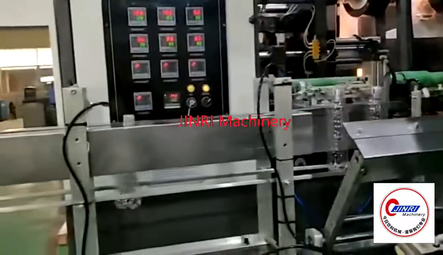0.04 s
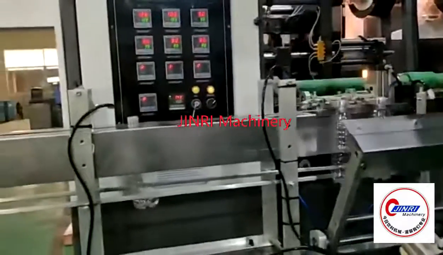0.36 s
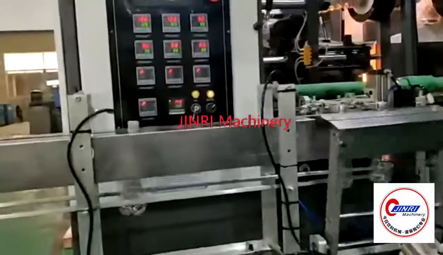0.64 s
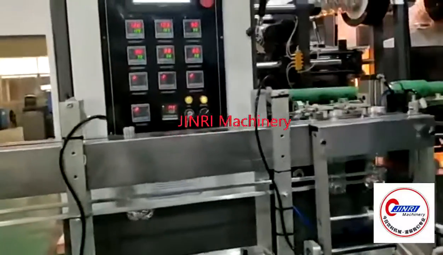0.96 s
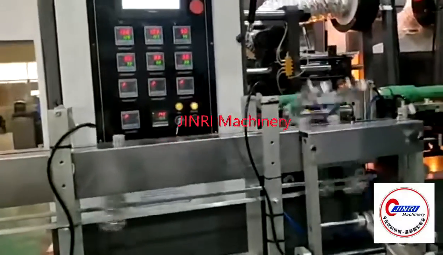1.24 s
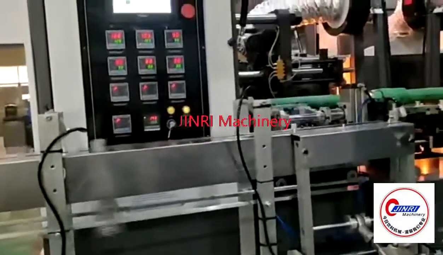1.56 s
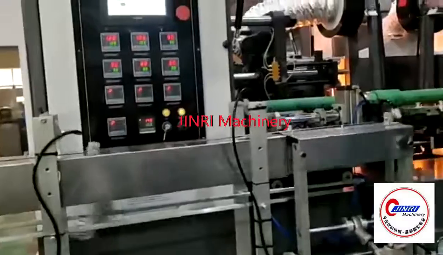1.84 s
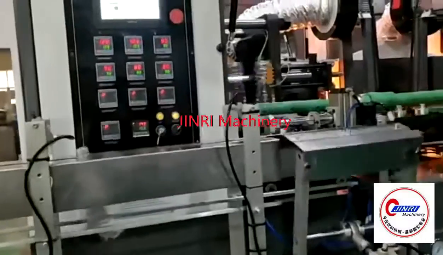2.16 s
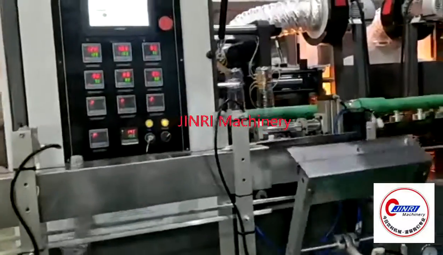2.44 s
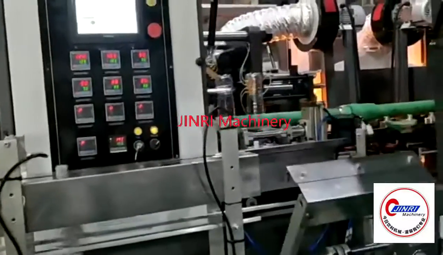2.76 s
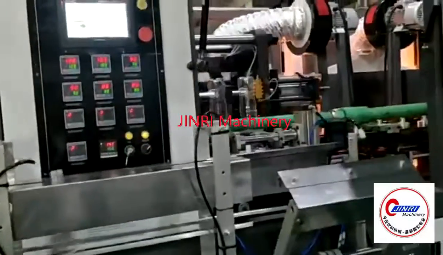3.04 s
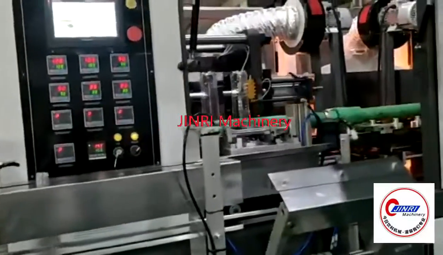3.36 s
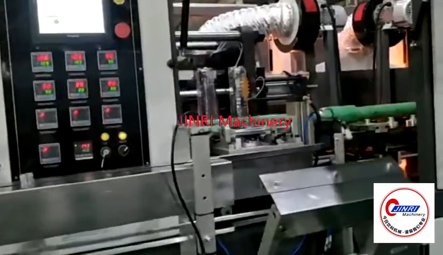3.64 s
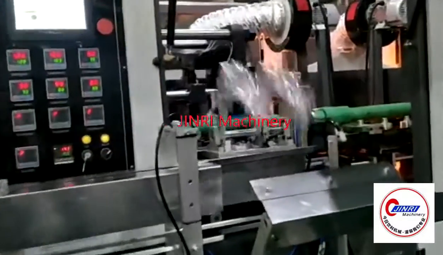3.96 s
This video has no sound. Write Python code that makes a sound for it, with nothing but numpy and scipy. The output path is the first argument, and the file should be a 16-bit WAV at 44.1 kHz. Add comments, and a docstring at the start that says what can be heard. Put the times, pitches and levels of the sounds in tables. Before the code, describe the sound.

A bottle blowing machine hisses bursts of compressed air over clunks, rattles and low rumble.

```python
"""A bottle blowing machine runs through one cycle in a factory hall, close by.
First the carriage throbs, rattles and clunks against the steel frame as valves dump air in fading hisses.
Just after a second, a hard, steady blast cuts in, shuts off and leaves a hollow ring behind.
After a lull of small puffs and clunks, another valve vents and the carriage rumbles on again.
Near the end the closing stop clangs, and a last valve opens."""
import sys
import numpy as np
from scipy import signal
from scipy.fft import rfft, irfft, next_fast_len
from scipy.io import wavfile
from scipy.ndimage import uniform_filter1d, map_coordinates

SR = 44100
rng = np.random.default_rng(int(sys.argv[2]) if len(sys.argv) > 2 else 0)


def output_pcm(signal):
    """Save a mono or channel-first signal as 16-bit PCM at the path in sys.argv[1].

    Samples are clipped to [-1, 1] before scaling.
    """
    pcm = np.clip(np.atleast_2d(signal).T, -1, 1) * 32767
    wavfile.write(sys.argv[1], SR, np.round(pcm).astype(np.int16))


N = 176400

# The bright hiss of escaping air. Each row: frequency in Hz, relative level in dB.
HISS_SPECTRUM = [(2000, -17.5), (4200, 15), (5600, 7.5), (7800, -1), (10000, -2.5), (12500, -0.5),
                 (14500, -5), (16000, -24)]


def exhausts():
    """Valves dump compressed air: the pressure sags, and the hiss dies faster than the roar."""
    # Exhaust valves. Each row: start in seconds, rise in seconds, time open in seconds, level in dB,
    # pressure fall in dB per second, hiss against the roar in dB.
    valves = [(-.06, .05, 0.26, -24.5, 16, -11), (0.267, 0.16, 0.79, -19, 28.5, -8.5),
              (2.607, 0.079, 0.82, -18.5, 16, -3), (3.944, 0.068, 0.18, -19.5, 13, -2)]
    # Small pilot valve puffs. Each row: start in seconds, rise in seconds, level in dB.
    puffs = [(.785, 0.012, -34.5), (1.039, 0.045, -51), (2.012, 0.0053, -50.5), (2.2, 0.053, -47),
             (2.388, 0.053, -47), (2.88, 0.046, -29), (3.23, 0.029, -36.5), (3.632, 0.053, -47)]
    # The roar of the vent. Each row: frequency in Hz, relative level in dB.
    roar_spectrum = [(100, -29), (350, -9), (680, 1.5), (900, -2.5), (1300, 1), (1950, 2.5), (2700, -1.5),
                     (3500, 1.5), (4450, -1), (4750, -16), (6000, -13.5), (7500, -25.5), (11000, -63),
                     (16000, -60)]
    close_db_per_s, puff_fall_db_per_s, hiss_sag_ratio = 79, 137, 2.53
    roar_power, hiss_power = np.zeros(N), np.zeros(N)
    for start, rise, length, db, fall_db_per_s, hiss_db in valves:
        sag_db = fall_db_per_s * since(start + rise)
        flow = opening(start, rise) * amp(db - close_db_per_s * since(start + length))
        roar_power += (flow * amp(-sag_db)) ** 2
        hiss_power += (flow * amp(hiss_db - hiss_sag_ratio * sag_db)) ** 2
    for start, rise, db in puffs:
        hiss_power += (opening(start, rise) * amp(db - puff_fall_db_per_s * since(start + rise))) ** 2
    flutter = amp(1.2 * wobble(35.47))
    roar = np.sqrt(roar_power) * rush(roar_spectrum)
    hiss = np.sqrt(hiss_power) * rush(HISS_SPECTRUM)
    return flutter * (roar + hiss)


def blast():
    """A spluttering jet shuts off sharply; spent air and a wavering hollow ring linger."""
    # The hard jet. Each row: frequency in Hz, relative level in dB.
    jet_spectrum = [(88, -70), (150, -27), (205, -14), (320, -30), (389, -12.5), (463, -21), (697, -5),
                    (933, -9.5), (1200, -3.5), (1880, -3.5), (2770, -15.5), (4250, -8), (7330, -22),
                    (9810, -28), (12900, -17.5), (15600, -24)]
    # The wash of spent air. Each row: frequency in Hz, relative level in dB.
    wash_spectrum = [(180, -71), (300, -39), (691, 0.5), (1020, -16), (1310, -17), (1570, -2), (2780, -5),
                     (3670, -5.5), (5350, -14.5), (12900, -35.5), (15000, -49)]
    # The hollow ring. Each row: pitch in Hz, width in Hz, relative level in dB.
    cavity_modes = [(739, 104, 0.5), (1285, 76, 3.5), (1860, 110, -7), (3640, 29, -7.5), (4470, 87, -11)]
    on_s, off_s, shutoff_db_per_s = 1.152, 1.565, 524

    def gate(db, fall_db_per_s):
        return opening(on_s, rise_s=0.017) * amp(db - fall_db_per_s * since(off_s))
    hollow = resonances(cavity_modes) * amp(1.2 * wobble(30)) * opening(on_s, rise_s=0.24)
    jet = gate(-16.5, shutoff_db_per_s) * amp(1.5 * wobble(39.54)) * rush(jet_spectrum)
    splutter = gate(-30, shutoff_db_per_s) * unit(amp(6 * wobble(81))) * rush(HISS_SPECTRUM)
    ring = gate(-24.5, fall_db_per_s=42) * hollow
    wash = gate(-25, fall_db_per_s=79) * rush(wash_spectrum)
    return jet + splutter + ring + wash


def mottle(air):
    """A faint, watery warble: patches of the spectrum swell and sink at random."""
    depth_db = 2
    spectrum = signal.stft(air, nperseg=1024)[2]
    patches = uniform_filter1d(rng.standard_normal(spectrum.shape[1:]), size=7, axis=0)
    patches = uniform_filter1d(patches, size=6, axis=1)
    gain = unit(amp(depth_db * unit(patches)))
    return signal.istft(spectrum * gain, nperseg=1024)[1][:, :N]


def clunks():
    """Each blow follows a short scrape, rings the frame briefly and sets loose parts rattling."""
    # Blows on the frame. Each row: time in seconds, clank level in dB, rattle level in dB,
    # rattle t60 in seconds, brightness in dB per octave.
    blows = [(0.2, -34, -27.5, 1, -10), (.457, -16, -10.5, 0.1, -1.5), (0.609, -17.5, -23, 1, -5.5),
             (0.792, -16, -12.5, 0.25, -2.5), (0.81, -31, -16, 0.24, 7), (.824, -14, -20.5, 0.64, -7),
             (0.912, -33, -23.5, 0.74, -2), (1.155, -8, -17, 0.41, 0), (1.419, -11.5, -40, 0.12, 3),
             (1.478, -11, -29.5, 0.74, -3), (1.529, -19, -22.5, 0.25, 7), (1.741, -35, -27.5, 0.38, 3),
             (2.019, -31, -30, 0.44, -5.5), (2.07, -42, -27, 0.28, -8.5), (2.154, -14.5, -29, 0.77, -3),
             (2.182, -36, -25.5, 0.54, -2), (2.897, -35, -20, 1.0, -1), (3.11, -24, -27, 0.52, -14),
             (3.638, -36, -37, 0.43, 2), (3.661, -31, -28, 0.73, -0.5), (3.769, -46, -38, 1, 6),
             (3.848, -59, -34.5, 1, -18)]
    # The steel frame's modes. Each row: pitch in Hz, relative level in dB.
    steel_modes = [(440, -14.5), (620, -11), (1130, 10), (1350, 3.5), (1530, -20), (1690, 0), (1960, 14.5),
                   (2250, -3), (3100, -4), (3650, -1.5), (4170, 6.5)]
    # The colour of the rattle. Each row: frequency in Hz, relative level in dB.
    rattle_spectrum = [(60, -27), (250, 0), (420, -4.5), (650, 3.5), (850, 2), (1050, 5.5), (1600, 4.5),
                       (2200, 3), (2800, -3), (4350, -2), (4750, -18), (7000, -27.5), (9000, -47),
                       (15000, -41)]
    clank_t60_s, clank_rise_s, scrape_db, scrape_s = 0.029, 0.00034, -6, 0.0088
    out = np.zeros((2, N))
    t = np.arange(SR // 5) / SR
    hz, mode_db = np.transpose(steel_modes)[:, :, None]
    for start, clank_db, rattle_db, t60, tilt_db in blows:
        strength, detune = rng.standard_normal((2, len(hz), 1))
        phase = rng.uniform(0, 2 * np.pi, hz.shape)
        phase = phase + 0.21 * rng.standard_normal((2, len(hz), 1))  # a little stereo width
        gains = amp(mode_db + 2 * strength + tilt_db * np.log2(hz / 1000))
        modes = gains * np.sin(2 * np.pi * hz * (1 + 0.029 * detune) * t + phase)
        attack = 1 - np.exp(-t / clank_rise_s)
        clank = unit(modes.sum(1)) * attack * amp(clank_db - 60 * t / clank_t60_s)
        first = round(start * SR)
        out[:, first:first + len(t)] += clank[:, :N - first]
        scrape = amp(scrape_db) * np.exp(-abs(np.arange(N) / SR - start) / scrape_s)
        envelope = np.maximum(scrape, strike(start, rise_s=0.004, t60_s=t60))
        chatter = unit(amp(1.58 * wobble(130)))
        out += amp(rattle_db) * envelope * chatter * rush(rattle_spectrum, tilt_db)
    return out


def carriage():
    """The moving carriage rumbles and throbs, and thuds at its stops."""
    # The rumble as it travels. Each row: time in seconds, level in dB.
    travel = [(0.0, -31), (.19, -34.5), (.205, -26), (.42, -28), (.8, -24), (1.13, -31.5), (1.23, -48),
              (1.76, -55), (2.0, -56), (2.29, -41.5), (2.38, -52), (2.6, -44.5), (2.672, -29), (3.0, -24.5),
              (3.18, -32), (3.3, -25), (3.582, -40), (3.66, -30), (3.92, -33)]
    # The weight of the rumble. Each row: frequency in Hz, relative level in dB.
    rumble_spectrum = [(20, -16), (50, -4), (90, -2), (150, 0), (220, 2.5), (300, -1), (390, -16.5),
                       (600, -23.5), (1000, -30), (3000, -66)]
    # Heavy stops and jolts. Each row: start in seconds, pitch in Hz, level in dB.
    thuds = [(0.197, 246, -18), (.51, 201.6, -14), (0.656, 108, -18.5), (0.785, 186.4, -16),
             (.85, 208, -16.5), (1.131, 224, -26), (1.334, 213, -35), (1.496, 215.3, -22),
             (1.834, 215, -37.5), (2.095, 193, -38), (2.231, 90, -32), (2.46, 201, -28),
             (2.513, 112, -24.5), (2.906, 235, -18), (3.232, 124, -16), (3.26, 198.3, -15),
             (3.675, 92.6, -25), (3.949, 72, -16)]
    level_db = np.interp(np.arange(N) / SR, *np.transpose(travel))
    throb_db = 2 * wobble(30)
    out = amp(level_db + throb_db) * rush(rumble_spectrum)
    for start, hz, db in thuds:
        out += amp(db) * strike(start, rise_s=0.013, t60_s=0.2) * np.sin(2 * np.pi * hz * since(start))
    return out


def squeaks():
    """Single metal parts sing out in a narrow band."""
    # Each row: start in seconds, pitch in Hz, level in dB, t60 in seconds.
    parts = [(.292, 4150, -25.5, 0.46), (0.455, 957, -22, 0.61), (.615, 1180, -22, 0.61),
             (1.523, 4950, -12, 0.082), (2.396, 2280, -40, 0.17), (3.776, 3770, -37, 0.38)]
    width_share = 0.12  # of the pitch
    return sum(amp(db) * strike(start, rise_s=0.0048, t60_s=t60) * resonances([(hz, width_share * hz, 0)])
               for start, hz, db, t60 in parts)


def knocks():
    """The sheet housing answers some blows with a short, boxy knock."""
    # Dull knocks. Each row: start in seconds, level in dB.
    hits = [(0.791, -22), (1.484, -36), (2.154, -32), (2.897, -21), (2.944, -23), (3.0, -25.5),
            (3.111, -26), (3.636, -25.5)]
    # The body of the housing. Each row: frequency in Hz, relative level in dB.
    housing_spectrum = [(200, -21), (330, -3), (420, 2), (630, -3.5), (800, -49), (1500, -49)]
    power = sum((amp(db) * strike(start, rise_s=0.0017, t60_s=0.2)) ** 2 for start, db in hits)
    return np.sqrt(power) * rush(housing_spectrum)


def clang():
    """The closing stop is struck sharply and rings in a few narrow modes."""
    # Each row: pitch in Hz, relative level in dB.
    stop_modes = [(1000, 1), (1190, -1), (1910, -4), (2220, -1), (3830, -14.5), (4100, -6)]
    start_s, level_db, width_hz = 3.636, -30.5, 34
    ring = resonances([(hz, width_hz, db) for hz, db in stop_modes])
    return amp(level_db) * strike(start_s, rise_s=0.0028, t60_s=0.54) * ring


def panels(near):
    """Nearby steel panels colour the air and the blows with quick reflections."""
    level, t60_s, delay_s = amp(-9), 0.062, 0.004
    tail = echoes(near, [(1000, t60_s)])
    reflections = filtered(tail, lambda hz: np.exp(-2j * np.pi * hz * delay_s))
    return (near + level * reflections) / np.hypot(1, level)


def hall(near):
    """The factory hall answers with a faint, short reverb."""
    # Each row: frequency in Hz, t60 in seconds.
    decay_times = [(500, 0.48), (4000, 0.14), (12000, 0.37)]
    return amp(-20) * echoes(near, decay_times)


def room_tone():
    """A faint, steady bed of noise lies under the machine."""
    # Each row: frequency in Hz, relative level in dB.
    bed_spectrum = [(40, -9), (200, -4), (360, -45), (2200, -2), (3000, -26), (4900, -13), (6500, -67),
                    (15000, -72)]
    return amp(-57) * rush(bed_spectrum)


def amp(db):
    return 10 ** (np.asarray(db) / 20)


def unit(x):
    return x / np.sqrt(np.mean(x ** 2) + 1e-20)


def along(points, hz):
    """A curve through (Hz, value) points on a log frequency axis."""
    freqs, values = np.transpose(points)
    return np.interp(np.log(hz + 1), np.log(freqs + 1), values)


def since(start):
    """Seconds elapsed after start, zero before."""
    return np.maximum(np.arange(N) / SR - start, 0)


def opening(start, rise_s):
    """A smooth rise from 0 to 1."""
    return np.sin(np.pi / 2 * np.minimum(since(start) / rise_s, 1)) ** 2


def strike(start, rise_s, t60_s):
    """The envelope of a hit: a smooth attack, and a fall of 60 dB in t60_s."""
    return opening(start, rise_s) * amp(-60 * since(start) / t60_s)


def wobble(rate):
    """A smooth random curve, rate knots a second."""
    return map_coordinates(rng.standard_normal(int(N * rate / SR) + 4), [np.arange(N) * rate / SR])


def filtered(x, response):
    """x shaped by a frequency response."""
    size = next_fast_len(N + SR // 4)
    return irfft(rfft(x, size) * response(np.fft.rfftfreq(size, 1 / SR)), size)[..., :N]


def noise(gain):
    """Stereo noise of rms 1, near mono in the bass and wide in the treble."""
    # Each row: frequency in Hz, correlation of left and right.
    correlation = [(60, 1), (300, 0.91), (600, 0.73), (1200, 0.12), (2400, 0.034), (6000, 0.039)]

    def mid_side(hz):
        turn = np.arccos(np.clip(along(correlation, hz), -1, 1)) / 2
        return gain(hz) * np.array([np.cos(turn), np.sin(turn)])
    mid, side = filtered(rng.standard_normal((2, N)), mid_side)
    return unit(np.array([mid + side, mid - side]))


def rush(spectrum, tilt_db=0):
    """Noise with a spectrum, tilted by tilt_db per octave from 500 to 5000 Hz."""
    return noise(lambda hz: amp(along(spectrum, hz) + tilt_db * np.log2(np.clip(hz, 500, 5000) / 1000)))


def resonances(peaks):
    """Noise ringing in (Hz, width Hz, dB) peaks."""
    return noise(lambda hz: sum(amp(db) / (1 + (2 * (hz - pitch) / width) ** 2)
                                for pitch, width, db in peaks))


def echoes(x, t60s):
    """Diffuse reflections of x, dying away by (Hz, t60 in seconds) points."""
    hz, t, spectrum = signal.stft(rng.standard_normal((2, SR // 2)), SR, nperseg=256)
    t60 = along(t60s, hz)[:, None]
    tail = signal.istft(spectrum * amp(-60 * t / t60) / np.sqrt(t60), SR, nperseg=256)[1]
    return signal.fftconvolve(x, tail / np.linalg.norm(tail[0]), axes=1)[:, :N]


def scene():
    """Air and metal bounce off the panels and the hall, over the dry carriage and the room tone."""
    air = mottle(exhausts() + blast())
    near = panels(air + clunks() + clang() + squeaks() + knocks())
    return near + hall(near) + carriage() + room_tone()


def record(dry):
    """Each microphone port has its own colour, and the very top is cut away."""
    # Each row: frequency in Hz, left minus right in dB.
    balance = [(100, -0.5), (700, -2), (1200, 3), (2200, -5.5), (2800, -5.5), (3500, 2.5), (4400, 7.5),
               (5200, -2.5), (6300, -10), (8500, -8), (11000, -1), (14500, -6)]
    top_hz = 15800

    def ports(hz):
        lean = amp(along(balance, hz) * np.array([[.5], [-.5]]))
        return lean / np.sqrt(np.mean(lean ** 2, axis=0)) * (hz < top_hz)
    return filtered(dry, ports)


dry = scene()
out = record(dry)
output_pcm(out)
```